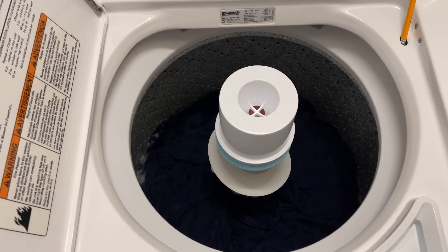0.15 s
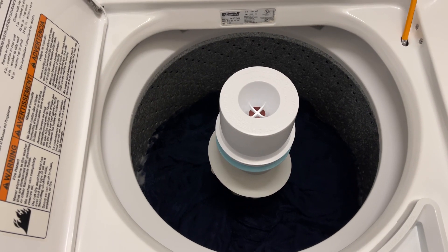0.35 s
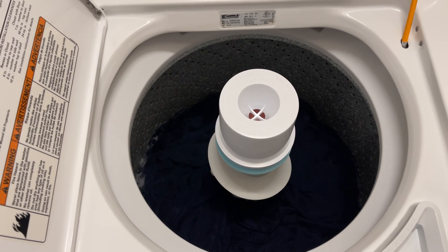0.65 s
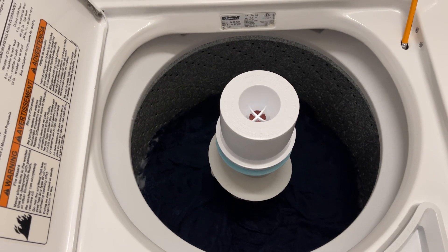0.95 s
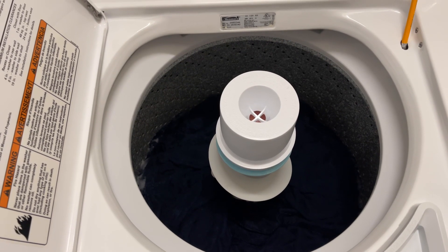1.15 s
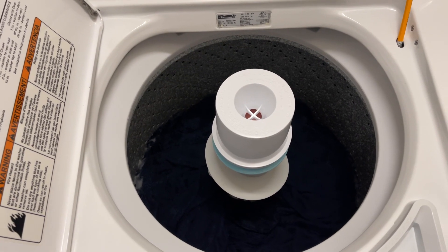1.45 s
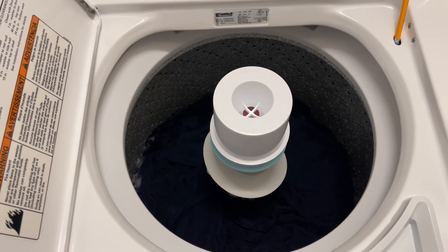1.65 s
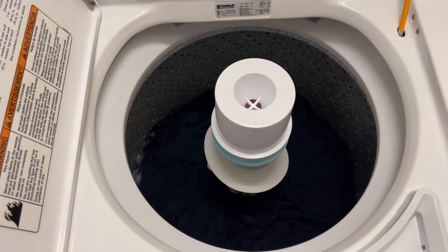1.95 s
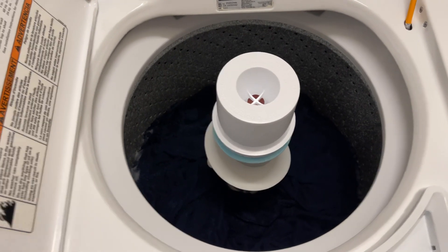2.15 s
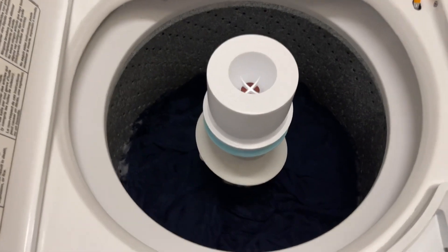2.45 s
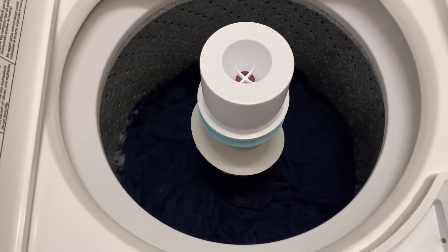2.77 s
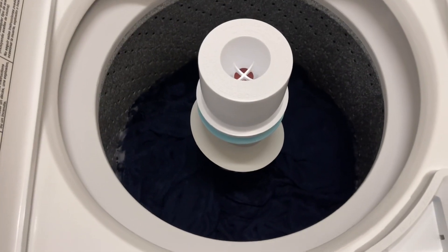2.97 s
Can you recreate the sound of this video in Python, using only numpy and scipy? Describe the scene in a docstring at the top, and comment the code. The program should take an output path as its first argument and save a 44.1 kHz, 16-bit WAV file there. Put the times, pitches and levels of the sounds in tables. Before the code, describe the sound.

A top-loading washer drains, its low hum swelling and sinking under rushing, bubbling water.

```python
"""The motor of a top-loading washing machine hums at twice the mains rate as the tub drains, swelling and sinking.
Tones of its turning shaft join the hum, and narrow bands of noise make the cabinet rumble.
Shaped noise makes the water rush and the steel tub ring; small bubbles that rise in pitch gurgle.
A few louder glugs pair a bubble with a splash; ticks and short noise bursts make the spray.
Heard from just above the open tub; partway through, the listener moves in closer."""
import sys
import numpy as np
from scipy import signal
from scipy.fft import rfft, irfft
from scipy.io import wavfile

SR = 44100
rng = np.random.default_rng(int(sys.argv[2]) if len(sys.argv) > 2 else 0)


def int16_out(signal):
    """Quantize to a 16-bit WAV file."""
    q = np.round(np.clip(np.atleast_2d(signal).T, -1, 1) * 32767)
    wavfile.write(sys.argv[1], SR, q.astype(np.int16))


N = 137151  # length of the scene [samples]
MAINS_HZ = 60.0
LEAN_START_S, LEAN_END_S = 1.69, 2.34  # the listener moves in over the tub

# Rise and fall of the motor hum: (time [s], relative level [dB])
HUM_SWELL = [(0, -39), (.04, -20.5), (.12, -38), (.22, -18.5), (.35, -16.5), (.5, -36), (.67, -16),
             (.78, -23.5), (.86, -20), (1.01, -20.5), (1.1, -33), (1.2, -22), (1.32, -15), (1.47, -20),
             (1.56, -28.5), (1.68, -16), (1.77, -20.5), (1.86, -15.5), (2.01, -15), (2.11, -25.5),
             (2.23, -19), (2.32, -13.5), (2.5, -18.5), (2.67, -16), (2.77, -20.5), (2.86, -15.5),
             (2.98, -12.5), (3.11, -20.5)]


def motor(t):
    """Mains current makes a hum with overtones; the turning shaft adds tones at multiples of its own rate."""
    # Overtones of the hum: (multiple of the mains rate, level [dB], left minus right [dB])
    overtones = [(4, -40, -3), (6, -33, -3.5)]
    # Tones of the shaft: (multiple of the shaft rate, level [dB], left minus right [dB])
    shaft_tones = [(3, -29, -5), (7, -49.5, -2), (9, -38.5, 0.5), (10, -40, -7), (11, -41.5, 1),
                   (13, -47.5, 18.5), (15, -38.5, 5), (16, -46.5, -10), (17, -49, 5), (19, -45.5, 0),
                   (22, -49.5, -12.5)]
    shaft_hz, speed_wander = 29.6, 0.003  # the wander is a share of the speed
    hum_offset_db, hum_pan_db, hum_wobble_rad = -1.5, -5, 0.4
    pump_flutter, shaft_flutter, overtone_flutter = 0.1, 0.62, 0.36
    fade_db, fade_hz = 2.5, 4.5

    mains = 2 * np.pi * MAINS_HZ * t
    turn = 2 * np.pi * np.cumsum(shaft_hz * (1 + speed_wander * walk(2.22))) / SR
    swell = undb(hum_level(t) + hum_offset_db)
    hum = np.sqrt(2) * swell * np.sin(2 * mains + hum_wobble_rad * walk(2.56))
    out = pan(hum_pan_db) * hum

    for multiple, db, pan_db in overtones:
        phase = multiple * mains + 2 * np.pi * rng.random()
        out += pan(pan_db) * tone(phase, db, overtone_flutter) * fading(fade_db, fade_hz)

    load = strain(t)
    for i, (multiple, db, pan_db) in enumerate(shaft_tones):
        phase = multiple * turn + 2 * np.pi * rng.random()
        if i == 0:  # the pump's tone is the steadiest
            partial = tone(phase, db, pump_flutter)
        else:
            partial = load * fading(fade_db, fade_hz) * tone(phase, db, shaft_flutter)
        out += pan(pan_db) * partial
    return out


def cabinet(t):
    """Uneven churning in the pump rumbles through the panels; the deepest part lies to the right."""
    # Resonances of the panels: (centre [Hz], half width at half strength [Hz], relative level [dB])
    panels = [(57, 4.9, -42), (113.5, 7.4, -38.5), (150.5, 28.6, -40.5), (270, 16, -44), (325.4, 15, -41),
              (381, 49, -40.5), (449, 50, -42), (538, 32, -49.5)]
    deep_pan_db, churn_db = -14, 2
    lean_db = -2.5  # the rumble weakens as the listener moves in

    rumble = np.zeros((2, N))
    for hz, width_hz, db in panels:
        band = spread(shape(noise(), resonance(hz, width_hz)))
        rumble += pan(deep_pan_db * min(1, 150 / hz)) * level(band, db)
    churn = undb(churn_db * walk(4.1) + lean_db * (lean_in(t) - 0.5))
    return rumble * strain(t) * churn


def rush(t):
    """Flowing water surges, flickers by octave and rings the tub; moving in shifts the resonances heard."""
    # Colour of the rushing water: (frequency [Hz], relative level per Hz [dB])
    rush_colour = [(20, -17), (45, -6), (90, -6), (190, -4.5), (300, 2), (620, 1.5), (900, -1.5),
                   (1300, -1), (1900, -6), (2600, -10.5), (3250, -13), (4500, -14.5), (5400, -18.5),
                   (6200, -17.5), (7300, -23), (9000, -21), (10300, -15.5), (11500, -18.5), (13000, -47)]
    # Ringing of the tub: (centre [Hz], half width at half strength [Hz],
    # relative level before moving in [dB], relative level after [dB])
    tub_rings = [(548.4, 40, -41.5, -47.5), (795, 28, -38.5, -48), (1128, 76, -41.5, -36),
                 (1320, 29, -37.5, -43), (1556, 24, -43.5, -53), (1665, 34, -46.5, -42.5),
                 (1862, 110, -45.5, -44.5), (2175, 43, -48, -48), (2404, 39, -54, -47.5),
                 (2775, 70, -52.5, -51), (4130, 140, -51.5, -57.5)]
    rush_db, surge_db, flicker_db, throb_depth = -31.5, 1.1, 0.5, 0.03

    surge = surge_db * walk(14.2)
    lean = lean_in(t)
    flow = np.zeros((2, N))
    for share in (1 - lean, lean):  # the far listening place blends into the near one
        flow += np.sqrt(share) * shape(noise(), undb(curve(rush_colour)) * standing_waves())

    octave = np.log2(freqs())
    water = np.zeros((2, N))
    for k in range(4, 15):
        band = shape(flow, np.maximum(1 - abs(octave - k), 0))
        water += band * undb(surge + flicker_db * walk(33))

    rings = np.zeros((2, N))
    for hz, width_hz, far_db, near_db in tub_rings:
        rings += sloshing(hz, width_hz) * undb(far_db + lean * (near_db - far_db))
    throb = 1 + throb_depth * np.sin(2 * np.pi * 2 * MAINS_HZ * t)
    return spread(level(water, rush_db) + rings * undb(surge)) * throb


def gurgle(t):
    """A stream of small bubbles of many pitches and strengths echoes in the tub."""
    bubbles_per_s, strength_spread_db, gurgle_db = 380, 2.8, -41
    low_hz, high_hz, ring_cycles = 560, 2163, 10.8

    streams = np.zeros((2, N))
    age = t[:SR // 16]
    for when, size, pitch, side in rng.random((int(bubbles_per_s * N / SR), 4)):
        hz = low_hz * (high_hz / low_hz) ** pitch
        strength = undb(strength_spread_db * min(-np.log(1 - size), 3))
        add(streams[int(2 * side)], when * N / SR, strength * bubble(age, hz, ring_cycles))
    return level(in_tub(streams, 5.5), gurgle_db)


def glugs(t):
    """Each breaking air pocket rings as one large bubble, with a splash muffled by the wet laundry."""
    # Air pockets: (time [s], bubble pitch at the start [Hz], cycles to fade to 37 % [count],
    # relative bubble level [dB], splash centre before muffling [Hz], splash decay [s],
    # relative splash level [dB])
    pockets = [(0.314, 1750, 8.5, -14, 1630, .025, -28), (.341, 1210, 4, -18, 850, 0.0082, -28),
               (.400, 1230, 4.9, -21, 560, 0.021, -25.5), (0.658, 780, 4.6, -16, 1200, 0.035, -29),
               (0.67, 1530, 11, -20, 1500, 0.012, -33), (0.736, 1550, 5, -35, 1590, 0.041, -30),
               (0.854, 1070, 7, -23, 1100, 0.01, -28), (.875, 790, 3.5, -27, 1420, 0.028, -27.5),
               (1.016, 1320, 6, -40, 1700, 0.019, -31), (1.136, 1120, 6.7, -21, 1400, 0.016, -32),
               (1.208, 1820, 11, -22.5, 1700, 0.011, -37), (1.316, 1500, 6, -20.5, 1110, 0.049, -30),
               (1.378, 840, 9, -24, 610, 0.045, -25), (1.514, 716, 5, -36, 600, 0.018, -26),
               (1.535, 1080, 4.1, -14.5, 1200, 0.043, -25.5), (1.608, 1280, 7.2, -22, 1200, 0.017, -31),
               (1.817, 1740, 12, -22, 1600, 0.015, -36), (1.89, 1300, 12, -22, 1490, 0.012, -39),
               (2.133, 1100, 3.3, -11, 950, 0.013, -21.5), (2.137, 1636, 13, -15, 1400, 0.013, -22),
               (2.408, 1100, 11, -21, 1150, .015, -39), (2.682, 1190, 8.8, -20, 1700, 0.057, -36),
               (2.833, 2440, 31, -27, 1910, 0.028, -32), (2.915, 1950, 14, -30, 1900, 0.028, -38),
               (3.028, 1170, 6, -21, 2400, 0.047, -34)]
    glug_db, splash_db = -3, -2.5  # added to every bubble level and to every splash level
    attack_s, splash_octaves, muffle_hz = 0.00081, 0.5, 2260

    out = np.zeros(N)
    age = t[:SR // 6]
    attack = np.minimum(age / attack_s, 1)
    muffle = 1 / np.sqrt(1 + (freqs() / muffle_hz) ** 10)
    for start, hz, cycles, bubble_db, splash_hz, decay_s, pocket_splash_db in pockets:
        band = muffle * np.exp(-(np.log2(freqs() / splash_hz) / splash_octaves) ** 2 / 2)
        splash = level(shape(rng.standard_normal(N), band), pocket_splash_db + splash_db)
        splash = splash[:len(age)] * np.exp(-age / decay_s)
        ring = undb(bubble_db + glug_db) * bubble(age, hz, cycles)
        add(out, start, attack * (ring + splash))
    return in_tub(out, -5)


def spray(t):
    """Fine droplets tick in clumps; now and then a handful spatters on the wall."""
    # Colour of the fine droplets: (frequency [Hz], relative level per Hz [dB])
    drop_colour = [(1000, -54), (2800, 2), (5000, 15.5), (7500, -4), (11500, 14.5), (13000, -19)]
    # Spatters: (time [s], length [s], centre [Hz], relative level [dB])
    spatters = [(0.104, 0.026, 4700, -44), (0.295, 0.022, 4170, -43.5), (0.605, 0.03, 3160, -44),
                (0.77, 0.032, 6100, -45.5), (0.886, 0.025, 4820, -44), (1.204, 0.04, 6450, -47),
                (1.387, 0.015, 10700, -38.5), (1.62, 0.031, 4020, -42.5), (1.778, 0.048, 6300, -44.5),
                (2.215, 0.018, 10000, -46), (2.326, 0.018, 8600, -41), (2.73, 0.028, 4500, -43),
                (2.78, 0.0097, 10000, -38.5), (2.872, 0.014, 3950, -38.5), (3.02, 0.012, 11600, -43)]
    drops_per_s, drop_spread_db, clump_db, drop_db = 900, 12, 1.5, -55.5
    spatter_offset_db = 4

    hits = rng.random((2, N)) < drops_per_s / SR / 2
    strength = undb(drop_spread_db * np.minimum(rng.exponential(size=(2, N)), 4))
    drops = hits * np.sign(noise()) * strength
    out = level(shape(drops * undb(clump_db * walk(4.7)), undb(curve(drop_colour))), drop_db)

    for start, length, hz, db in spatters:
        age = np.maximum(t - start, 0) / length
        envelope = np.minimum(age / 0.2, 1) * np.exp(-age ** 2)
        out += envelope * level(shape(noise(), resonance(hz, hz * 0.34)), db + spatter_offset_db)
    return in_tub(out, 6)


def hum_level(t):
    """Relative level of the hum in dB, joined by straight lines between the listed times."""
    return np.interp(t, *np.array(HUM_SWELL).T)


def strain(t):
    """Gain of the vibration, following a share of the hum's swell in dB, with mean power 1."""
    load_share = 0.27
    return level(undb(load_share * hum_level(t)), 0)


def lean_in(t):
    """How far the listener has moved in: 0 before, 1 after."""
    return np.interp(t, (LEAN_START_S, LEAN_END_S), (0, 1))


def tone(phase, db, flutter, rate=9):
    """A sine partial whose strength and phase flutter at random."""
    wobble = walk(rate) * np.sin(phase) + walk(rate) * np.cos(phase)
    return np.sqrt(2) * undb(db) * (np.sin(phase) + flutter * wobble / np.sqrt(2))


def bubble(age, hz, cycles):
    """A short ring that rises in pitch as it dies."""
    rise = 0.034  # share of the pitch gained by the time the ring has faded to 37 %
    fade = age * hz / cycles
    pitch = hz * (1 + rise * np.minimum(fade, 2))
    return np.exp(-fade) * np.sin(2 * np.pi * np.cumsum(pitch) / SR)


def sloshing(hz, width_hz):
    """A tub resonance that swells, sinks and drifts in pitch as the water moves."""
    pitch_drift, drift_hz, flicker_db, flicker_hz = 0.008, 5, 2.5, 9
    ring = level(shape(noise(), resonance(hz, width_hz)), 0)
    i = np.arange(N)
    place = i + np.cumsum(pitch_drift * walk(drift_hz))  # uneven reading bends the pitch
    bent = np.array([np.interp(place % N, i, x) for x in ring])
    return bent * fading(flicker_db, flicker_hz)


def standing_waves():
    """Gain per frequency of the tub's many close resonances, drawn at random."""
    ripple_db, spacing_hz = 3.5, 38.28
    return undb(ripple_db * np.interp(freqs() / spacing_hz, np.arange(4096), rng.standard_normal(4096)))


def in_tub(x, wet_db):
    """Direct sound and dense short reflections from the steel wall, wet_db louder than the direct sound."""
    t60_s = 0.089  # time for the reflections to sink by 60 dB
    t = np.arange(SR // 3) / SR
    tail = noise()[:, :len(t)] * np.exp(-np.log(1000) * t / t60_s)
    tail *= undb(wet_db) / np.sqrt(np.sum(tail ** 2) / 2)
    direct = spread(x) if x.ndim == 2 else x
    echoes = signal.fftconvolve(x * np.ones((2, 1)), tail, axes=1)[:, :N]
    return (direct + spread(echoes)) / np.sqrt(1 + undb(2 * wet_db))


def spread(pair):
    """Blend two unrelated signals into left and right, alike in the bass and at the very top."""
    # Likeness of left and right: (frequency [Hz], likeness [0-1])
    likeness = [(60, 1), (170, 0.94), (280, 0), (500, 0.13), (800, 0), (1500, 0.02), (2800, 0), (4200, 0),
                (5000, 0), (8200, 0.18), (8900, 0.2), (9700, 0.98), (11800, 1)]
    alike = np.clip(curve(likeness), 0, 1)
    mid = shape(pair[0], np.sqrt((1 + alike) / 2))
    side = shape(pair[1], np.sqrt((1 - alike) / 2))
    return np.array([mid + side, mid - side])


def fading(depth_db, rate):
    """A gain that comes and goes at random, with mean power 1."""
    return level(undb(depth_db * walk(rate)), 0)


def walk(rate):
    """A smooth random curve of rms 1, with few changes faster than rate [Hz]."""
    return level(shape(rng.standard_normal(N), np.exp(-(freqs() / rate) ** 2 / 2)), 0)


def noise():
    """Two unrelated white noises."""
    return rng.standard_normal((2, N))


def resonance(hz, width_hz):
    """Steep band-pass, one resonance applied twice; half strength about width_hz off centre."""
    f = freqs()
    return (1 + 1j * (f / hz - hz / f) * hz / (2 * width_hz)) ** -2


def shape(x, gain):
    """Filter by a gain per frequency."""
    return irfft(rfft(x) * gain, N)


def curve(points):
    """Join (frequency [Hz], value) points by straight lines on a log frequency axis."""
    hz, value = np.array(points, float).T
    return np.interp(np.log(freqs()), np.log(hz), value)


def freqs():
    """Frequency of each spectrum bin in Hz, at least 1."""
    return np.maximum(np.arange(N // 2 + 1) * SR / N, 1)


def level(x, db):
    """Set the rms level in dB."""
    return x * undb(db) / np.sqrt(np.mean(x ** 2))


def pan(db):
    """Left and right gains that differ by db."""
    return undb(np.array([[db], [-db]]) / 2)


def undb(db):
    """Decibels to gain."""
    return 10 ** (np.asarray(db) / 20)


def add(out, start, sound):
    """Mix a sound in at a time in seconds."""
    i = int(np.clip(start * SR, 0, N - 1))
    out[..., i:i + len(sound)] += sound[:N - i]


def scene():
    """Machine and water together."""
    t = np.arange(N) / SR
    return motor(t) + cabinet(t) + rush(t) + gurgle(t) + glugs(t) + spray(t)


def record(dry):
    """Stereo processing turns the right side's phase in the treble; the top is cut and the ends are faded."""
    # Phase by which the right side leads: (frequency [Hz], lead [turns])
    stereo_phase = [(8700, 0), (9300, .25), (9750, .47), (10450, .52), (11050, .75), (11800, 1)]
    top_hz = 12500
    dry = dry * signal.windows.tukey(N, 0.001)
    right = shape(dry[1], np.exp(2j * np.pi * curve(stereo_phase)))
    top_cut = signal.ellip(10, 0.2, 80, top_hz, fs=SR, output="sos")
    return signal.sosfilt(top_cut, np.array([dry[0], right]))


dry = scene()
out = record(dry)
int16_out(out)
```